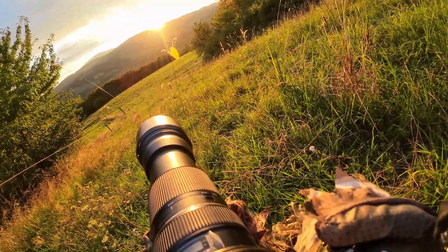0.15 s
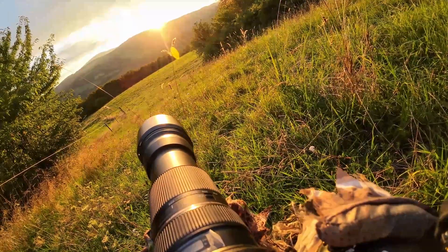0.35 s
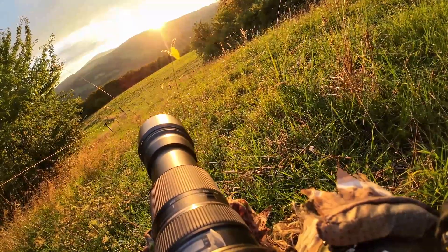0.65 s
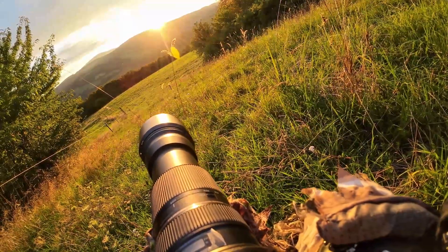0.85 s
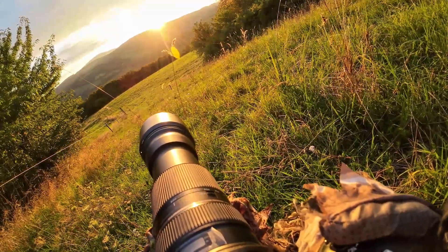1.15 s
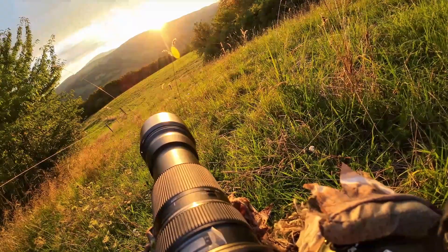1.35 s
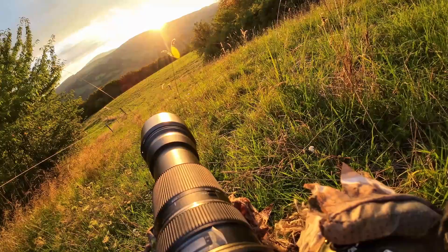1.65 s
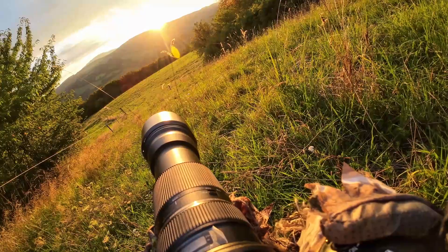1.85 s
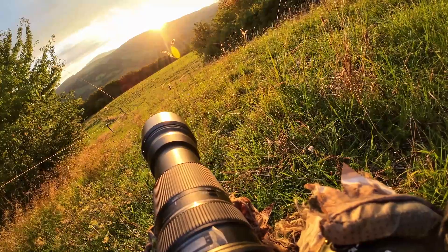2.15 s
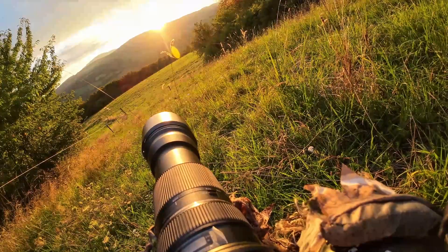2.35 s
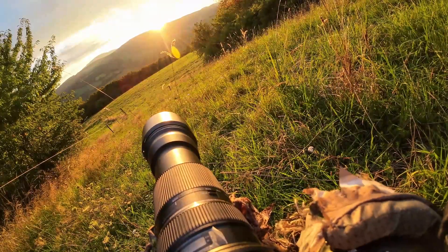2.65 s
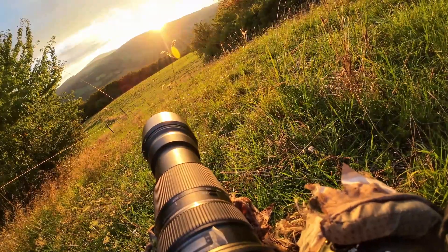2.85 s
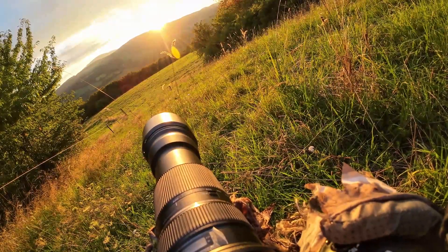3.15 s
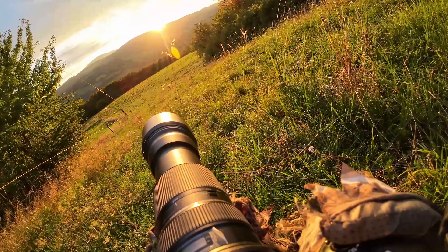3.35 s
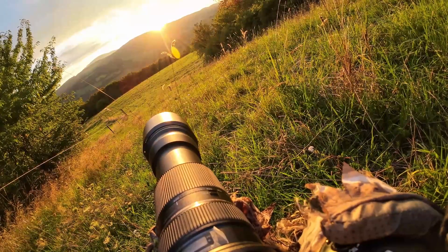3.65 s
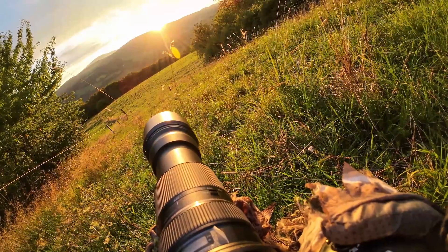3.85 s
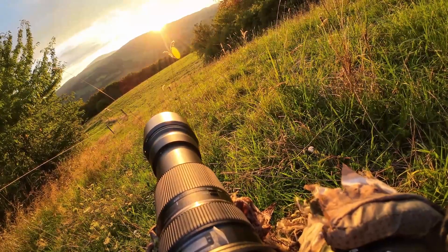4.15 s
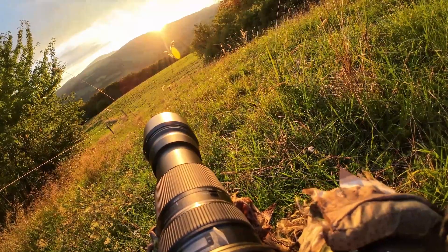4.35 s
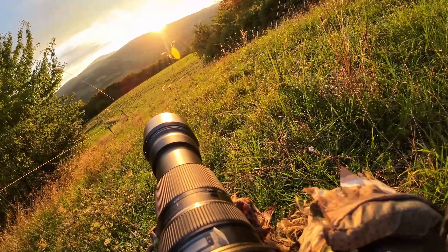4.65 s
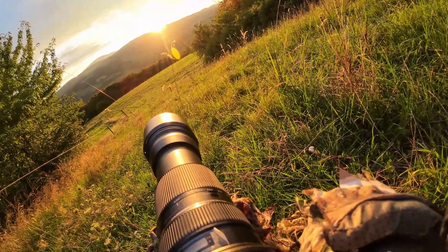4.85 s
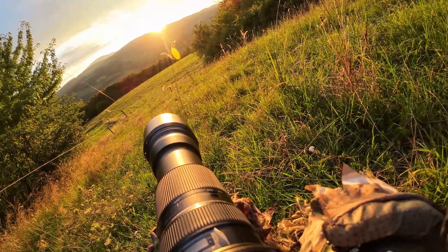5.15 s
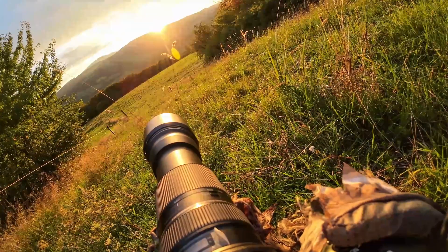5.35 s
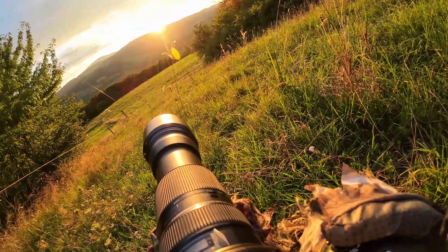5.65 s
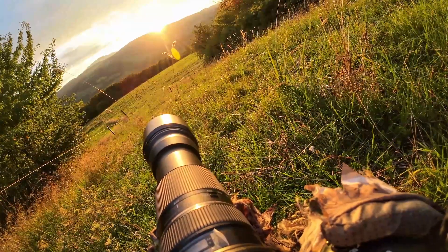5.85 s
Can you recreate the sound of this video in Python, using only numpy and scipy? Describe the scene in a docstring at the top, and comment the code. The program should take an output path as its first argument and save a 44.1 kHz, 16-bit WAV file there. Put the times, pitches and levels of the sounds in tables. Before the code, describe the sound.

A close camera shutter fires once, then twice more, among small dial clicks and soft microphone bumps, ending in a light wind gust.

```python
"""A reflex camera takes three pictures right beside a stereo microphone in a quiet meadow. Each time the mirror
flips up, the shutter curtains run, and a small motor drops the mirror and cocks the springs again. Around the
pictures, just as close, come small dry ticks and a dial clicking from notch to notch; soft bumps reach the
microphone through its mount. A light breeze buffets the microphone and swells to a gust at the end that thumps
it twice, and the grass returns a very faint echo of the clicks."""
import sys
import numpy as np
from scipy import signal
from scipy.fft import rfft, irfft, next_fast_len
from scipy.io import wavfile
from scipy.ndimage import uniform_filter1d, map_coordinates

SR = 44100
rng = np.random.default_rng(int(sys.argv[2]) if len(sys.argv) > 2 else 0)


def unload_wav(signal):
    """Save mono or channel-first audio to the path in sys.argv[1] as 16-bit WAV at rate SR, clipped to [-1, 1]."""
    wavfile.write(
        sys.argv[1],
        SR,
        np.round(np.clip(np.atleast_2d(signal).T, -1, 1) * 32767).astype(np.int16),
    )


N = 265041
HIT = 4096  # samples in one contact sound
T = (np.arange(HIT) - HIT // 16) / SR  # seconds around a contact

# the meadow's hush, with the microphone's faint high hiss near 15.5 kHz: freq_hz, density_db
HUSH_SPECTRUM = [(53, -32.5), (90, 2.5), (200, -4), (410, -7.5), (520, -11.5), (870, -13), (1440, -18.5),
                 (2300, -22), (4000, -27), (5600, -26.5), (8300, -35.5), (11000, -35), (13300, -44),
                 (15500, -39.5)]
# stereo width of the hush: freq_hz, side_minus_mid_db
HUSH_WIDTH = [(130, -8), (600, -5), (1400, -4.5), (3100, -0.5), (7000, 0)]
# breeze on the microphone's ports: freq_hz, density_db
BREEZE_SPECTRUM = [(8.8, -39), (15, 9), (38, -8.5), (67, -10), (119, -21.5), (162, -21.5), (189, -42.5),
                   (300, -40.5), (390, -63), (660, -120)]
# the gust's rumble on the ports: freq_hz, density_db
GUST_SPECTRUM = [(12, -12), (25, -0.5), (42, 0), (75, -8), (130, -18.5), (200, -33.5), (400, -65.5),
                 (700, -120)]
# stereo width of sounds beside the microphone: freq_hz, side_minus_mid_db
CLOSE_WIDTH = [(100, -4.5), (300, -8.5), (700, -21.5), (1300, -18.5), (2400, -13.5), (4400, -9),
               (8100, -1.5), (15000, 2)]
# small dry ticks: start_s, level_db, pitch_hz
TICKS = [(0.0498, -40, 3600), (0.7543, -38, 4300), (1.1098, -36, 5920), (2.2871, -40.5, 2500),
         (2.7292, -44, 2400), (3.3144, -39, 2450), (4.1904, -50.5, 7010), (5.455, -38, 6420),
         (5.9782, -40.5, 3600)]
# colour of a tick: freq_hz, density_db
TICK_SPECTRUM = [(880, -45), (1500, -15), (1810, -27.5), (2440, -5.5), (2970, -14), (6000, -3),
                 (8570, -11.5), (9470, -20), (14200, -25), (16000, -29.5)]
# resonances common to all ticks: freq_hz, width_hz, gain_db
TICK_MODES = [(2434, 130, 4), (3460, 180, 8), (6020, 400, -7)]
# the dial's steps from notch to notch: snap_s, level_db, climb_s
DIAL_STEPS = [(.094, -39.5, .028), (0.145, -38, 0.012), (.206, -39.5, 0.023), (0.3601, -33.5, 0.014),
              (0.587, -37.5, .008), (1.143, -35, .014), (1.171, -39.5, 0.019), (1.23, -36, 0.014),
              (1.268, -32.5, .016), (2.321, -33, 0.014), (2.52, -34, 0.019), (2.594, -35, 0.018),
              (3.344, -35, 0.015), (3.375, -34, 0.016), (3.998, -37.5, 0.0051), (4.162, -38, .02),
              (4.332, -36, 0.018), (4.825, -32.5, 0.0094), (5.997, -38, 0.011)]
# the dial's ball striking a notch: freq_hz, density_db
DETENT_SPECTRUM = [(240, -33), (400, -12), (712, 3), (1250, -25.5), (1940, -22), (2250, -22), (2960, -30),
                   (5860, -25.5), (6820, -40.5), (7350, -31.5), (9230, -39.5), (11800, -39), (15000, -54)]
# the ball scraping up a tooth: freq_hz, density_db
SCRAPE_SPECTRUM = [(290, -27.5), (500, 7), (896, 3), (2050, -6.5), (3320, -22), (6030, -17), (9120, -46.5),
                   (11100, -20), (15000, -44)]
# bumps on the microphone's mount, the last two being thumps of the gust: start_s, level_db, pitch_hz,
# right_port_db
BUMPS = [(1.2044, -19, 86.5, -13), (1.8262, -20.5, 75.3, -11.5), (4.1517, -22.5, 83.5, -13),
         (5.817, -32, 56, -1), (5.961, -38.5, 49.6, -8)]
# the mount shaking: freq_hz, density_db
SHAKE_SPECTRUM = [(20, -6), (60, -1), (110, -2), (200, -8.5), (350, -12.5), (600, -44), (1500, -100)]
# the pictures: release_s, rewind_start_s, rewind_stretch_ratio
PICTURES = [(2.6195, 2.7406, 0.98), (4.4567, 4.578, 0.98), (4.899, 5.0294, 1)]
# blows of an exposure, timed from the release: delay_s, level_db, part
EXPOSURE_BLOWS = [(-.001, -34, "lever"), (.0016, -5.5, "mirror"), (.0049, -6.5, "mirror"),
                  (.0135, -14.5, "catch"), (.015, -10.5, "catch"), (.0192, -15.5, "bounce"),
                  (.0417, -14.5, "curtain"), (.0455, -12.5, "curtain"), (.047, -20, "spring")]
# blows of a rewind, timed from the motor's start: delay_s, level_db, part
REWIND_BLOWS = [(.0365, -27.5, "cam"), (.042, -32.5, "cam"), (.066, -16, "pawl"), (.1015, -31.5, "lever"),
                (.1093, -19, "spring"), (.1153, -11.5, "spring"), (.1228, -23, "lever"),
                (.1258, -24.5, "lever"), (.1387, -21, "lever"), (.169, -24, "spring"), (.171, -28, "latch"),
                (.1928, -19.5, "latch"), (.198, -32, "latch"), (.235, -37.5, "cam"), (.240, -37, "cam")]
# colour of each camera part, by name: freq_hz, density_db
PART_SPECTRA = { "mirror": [(71, -61.5), (120, -28.5), (789, -20.5), (1290, -8), (2070, -10.5),
                (2340, -2.5), (2870, -7.5), (3740, -7), (4140, -25.5), (4780, -13), (8840, -22),
                (9400, -23), (10200, -18.5), (14400, -33.5), (16000, -40.5)], "catch": [(180, -43.5),
                (300, -8), (1390, -13), (2400, 1), (3080, -5.5), (3580, -6), (4370, 3.5), (6850, -20),
                (9390, -16), (12500, -22.5), (13800, -37), (16000, -34)], "bounce": [(71, -51),
                (120, -16.5), (727, -13.5), (1070, -1.5), (1580, -15.5), (2110, -12), (2430, -9.5),
                (2990, -12.5), (4590, -19.5), (5750, -20), (7050, -26), (10600, -26), (16000, -42)],
                "curtain": [(140, -48), (230, -4.5), (667, -12.5), (1040, -2), (2040, -9.5), (2390, -5),
                (2660, -12), (3020, -7.5), (3870, -12), (5920, -9), (7330, -27.5), (8010, -12),
                (9070, -24.5), (10300, -16.5), (16000, -37)], "cam": [(180, -43), (300, -17), (1060, -3),
                (1530, -19), (2440, -7.5), (3830, -16), (5160, -14.5), (9090, -28.5), (10400, -24),
                (13500, -51), (14700, -38.5), (16000, -47)], "pawl": [(350, -56.5), (600, -20.5),
                (1610, -11), (2240, -13.5), (3390, 2.5), (4050, -15.5), (6030, -17), (7210, -13.5),
                (8390, -10), (9360, -24), (10300, -9), (16000, -44)], "spring": [(240, -44), (400, -7.5),
                (655, -13), (1030, -3.5), (1600, -18), (2670, -1), (3810, -12.5), (5270, 1.5),
                (7280, -13.5), (11400, -14.5), (13900, -28.5), (16000, -29.5)], "lever": [(180, -40.5),
                (300, -11.5), (842, -3.5), (1840, -6.5), (2000, -7.5), (2400, -1), (3130, -11.5),
                (3580, -3.5), (4230, -10), (5160, -4), (6100, -19), (8090, -14.5), (16000, -42)],
                "latch": [(180, -46.5), (300, -15.5), (1030, -4.5), (1390, -14), (1640, -6), (1970, -13),
                (3030, -9), (3400, -6), (4160, -9.5), (4910, -9), (7950, -23), (9710, -17), (16000, -39)]}
# how long each part rings, by name: t60_s
PART_T60 = {"mirror": 0.0096, "catch": .011, "bounce": .021, "curtain": .018, "cam": .025, "pawl": 0.0055,
            "spring": 0.0092, "lever": .015, "latch": .014}
# resonances of the camera body, plus the microphone's high sheen near 15.6 kHz:
# freq_hz, width_hz, gain_db
BODY_AND_MIC_MODES = [(538.5, 24, -2), (650, 64, -3.5), (963, 160, -1), (1108, 94, -2), (1346, 190, -1),
                      (1838, 57, -1), (2325, 53, -2.5), (2470, 90, -0.5), (3500, 110, -5),
                      (5140, 110, -7.5), (15600, 830, -2.5)]
# whirr of the motor's gear train: freq_hz, density_db
GEAR_SPECTRUM = [(240, -30), (400, -8.5), (607, -9), (1070, -1.5), (1870, -12.5), (2290, -5.5),
                 (4050, -19.5), (4440, -12), (6950, -26.5), (10500, -31.5), (12700, -38.5), (13300, -51),
                 (16000, -37)]


def amp(db):
    """Decibels to amplitude."""
    return 10 ** (np.asarray(db) / 20)


def unit(x):
    """Scale to rms 1."""
    return x / np.sqrt(np.mean(x ** 2) + 1e-20)


def decay(t, t60):
    """A fade that loses 60 dB in t60 seconds."""
    return np.exp(-np.log(1000) * t / t60)


def gain_curve(points, size):
    """Gain in each bin of a size-sample FFT, from (freq_hz, db) points joined on a log axis."""
    hz, db = np.transpose(points)
    return amp(np.interp(np.log(np.fft.rfftfreq(size, 1 / SR) + 1), np.log(hz + 1), db))


def add(track, start_s, sound):
    """Mix a stereo sound into the track."""
    part = track[:, max(round(start_s * SR), 0):][:, :sound.shape[1]]
    part += sound[:, :part.shape[1]]


def stereo(pair, width=CLOSE_WIDTH):
    """Two unrelated sounds become mid and side of the two microphone ports."""
    mid, size = pair[0], pair.shape[1]
    side = irfft(rfft(pair[1]) * gain_curve(width, size), size)
    return np.array([mid + side, mid - side])


def noise(spectrum, size):
    """Two unrelated coloured noises of rms 1."""
    padded = next_fast_len(size)
    white = rfft(rng.standard_normal((2, padded)))
    return unit(irfft(white * gain_curve(spectrum, padded), padded)[:, :size])


def causal(gain):
    """The response with this gain that answers only after it is struck (minimum phase)."""
    cepstrum = irfft(np.log(gain + 1e-6))
    cepstrum[..., 1:HIT // 2] *= 2
    cepstrum[..., HIT // 2 + 1:] = 0
    return np.exp(rfft(cepstrum))


def ringing(spectrum, modes=()):
    """A part's response at unit power: a broad colour with resonances standing out of it."""
    hz = np.fft.rfftfreq(HIT, 1 / SR)
    peaks = 1 + sum(amp(db) / (1 + (2 * (hz - centre) / width) ** 2) for centre, width, db in modes)
    return causal(unit(gain_curve(spectrum, HIT) * peaks))


def grit():
    """Two white noises standing for the tiny contacts within a blow."""
    return rng.standard_normal((2, HIT))


def blow(contacts, t60, response, attack_s=0.00056, smooth_bins=32):
    """A dying chatter of tiny contacts, evened out over all bands, rings a part near the microphone."""
    age = np.maximum(T, 0)
    fade = decay(age, t60) * (1 - np.exp(-age / attack_s))
    chatter = rfft(contacts * fade)
    band_power = np.abs(uniform_filter1d(np.abs(chatter) ** 2, smooth_bins, axis=1))
    even_chatter = chatter / causal(np.sqrt(band_power)) * np.linalg.norm(fade)
    return signal.windows.tukey(HIT, 0.1) * stereo(irfft(even_chatter * response))


def hush(level_db=-66):
    """The even hush of the meadow, with the microphone's faint high hiss on top."""
    return amp(level_db) * stereo(noise(HUSH_SPECTRUM, N), HUSH_WIDTH)


def wind(breeze_db=-51, gust_db=-36, peak_s=5.857, rise_db_per_s=61, fall_db_per_s=20, lean_db=1):
    """A steady breeze and one gust buffet each port on its own, the left a little harder."""
    from_peak_s = np.arange(N) / SR - peak_s
    swell_db = np.minimum(rise_db_per_s * from_peak_s, -fall_db_per_s * from_peak_s)
    gust = amp(gust_db + swell_db) * noise(GUST_SPECTRUM, N)
    breeze = amp(breeze_db) * noise(BREEZE_SPECTRUM, N)
    return (breeze + gust) * amp([[lean_db], [-lean_db]])


def ticks(gain_db=-4, t60=0.0067, ping_width_hz=500, ping_db=4):
    """Tiny bright contacts close by, each with a brief ping of its own pitch."""
    out = np.zeros((2, N))
    for start_s, level_db, pitch_hz in TICKS:
        response = ringing(TICK_SPECTRUM, [*TICK_MODES, (pitch_hz, ping_width_hz, ping_db)])
        add(out, start_s + T[0], amp(level_db + gain_db) * blow(grit(), t60, response))
    return out


def dial(unseat_db=-46, scrape_db=-21.5, scrape_db_per_s=200.5, rough_db=4, snap_db=-2, t60=0.011):
    """The sprung ball leaves its notch, scrapes unevenly up a tooth and snaps into the next notch."""
    out, response = np.zeros((2, N)), ringing(DETENT_SPECTRUM)
    for snap_s, level_db, climb_s in DIAL_STEPS:
        add(out, snap_s - climb_s + T[0], amp(unseat_db) * blow(grit(), t60, response))
        loudness = amp(level_db + scrape_db + scrape_db_per_s * climb_s)  # a slower climb is louder
        swell = np.exp(-.5 * ((T - T.mean()) / (0.44 * climb_s)) ** 2)
        roughness = unit(amp(rough_db * unit(uniform_filter1d(rng.standard_normal(HIT), size=96))))
        scrape = loudness * swell * roughness * stereo(noise(SCRAPE_SPECTRUM, HIT))
        loudest_s = snap_s - 0.25 * climb_s
        add(out, loudest_s - HIT / 2 / SR, scrape)
        add(out, snap_s + T[0], amp(level_db + snap_db) * blow(grit(), t60, response))
    return out


def grass_echo(clicks, level_db=-40, t60=0.69):
    """Grass and bushes scatter a very faint, dull tail back to the microphone."""
    t = np.arange(SR // 2) / SR
    tail = noise([(200, -4.0), (1500, -0.5), (5000, -2.5), (15000, -20.5)], len(t)) * decay(t, t60)
    return amp(level_db) * signal.fftconvolve(clicks, tail / np.linalg.norm(tail[0]), axes=1)[:, :N]


def knock(pitch_hz, sag, right_db, sag_s=0.0031, attack_s=0.003, t60=0.069, shake_db=-19, shake_t60=0.22):
    """A soft knock rocks the mount, its pitch sagging, and leaves it shaking; the left port feels it most."""
    t = np.arange(2 * HIT) / SR
    phase = 2 * np.pi * np.cumsum(pitch_hz * (1 + sag * np.exp(-t / sag_s))) / SR
    rock = np.sin(phase) * decay(t, t60)
    shake = amp(shake_db) * noise(SHAKE_SPECTRUM, len(t))[0] * decay(t, shake_t60)
    left = (shake - rock) * (1 - np.exp(-t / attack_s))
    right = amp(right_db) * np.interp(t - 0.00027, t, left)  # reaches this port 0.27 ms later
    return np.array([left, right])


def bumps():
    """Now and then something nudges the microphone's mount, and near its peak the gust thumps it twice."""
    out = np.zeros((2, N))
    for start_s, level_db, pitch_hz, right_db in BUMPS:
        add(out, start_s, amp(level_db) * knock(pitch_hz, sag=1.4, right_db=right_db))
    return out


def mechanism(blows, runs, variation, scatter_db, body_db=-27, body_t60=0.08):
    """The same parts collide in order, nearly alike on every run; each blow leaves the body ringing."""
    out = np.zeros((2, N))
    for delay_s, level_db, part in blows:
        response, contacts = ringing(PART_SPECTRA[part], BODY_AND_MIC_MODES), grit()
        for start_s, stretch in runs:
            hit = blow(contacts + variation * grit(), PART_T60[part], response)
            body_ring = amp(body_db) * blow(grit(), body_t60, response)
            strength = amp(level_db + scatter_db * rng.normal())
            add(out, start_s + stretch * delay_s + T[0], strength * (hit + body_ring))
    return out


def shutter(thud_delay_s=0.0428, thud_db=-24.5):
    """The mirror flips up and the curtains run; the closing curtain jolts the mount."""
    runs = [(release_s, 1) for release_s, _, _ in PICTURES]
    out = mechanism(EXPOSURE_BLOWS, runs, variation=0.3, scatter_db=0.27)
    for release_s, _ in runs:
        add(out, release_s + thud_delay_s, amp(thud_db) * knock(pitch_hz=143, sag=0.52, right_db=-7.5))
    return out


def rewind():
    """Cam, pawl, levers and latch clatter as the mirror drops and the springs are cocked."""
    runs = [(start_s, stretch) for _, start_s, stretch in PICTURES]
    return mechanism(REWIND_BLOWS, runs, variation=0.45, scatter_db=1.1)


def motor_effort(t, idle_db=-59.5, load_db=14.5, peak_s=0.13, spread_s=0.066, run_s=0.25):
    """The motor's amplitude over a run: it turns freely, labours against the springs, then brakes."""
    springs = np.exp(-.5 * ((t - peak_s) / spread_s) ** 2)
    braking_db = 1300 * np.maximum(t - run_s, 0)
    return amp(idle_db + load_db * springs - braking_db)


def motor(tooth_hz=430, pulse_depth=0.5, shake_db=-53):
    """The gear train whirrs, its noise pulsing as the teeth mesh, and makes the body tremble."""
    out, t = np.zeros((2, N)), np.arange(SR // 3) / SR
    for _, start_s, stretch in PICTURES:
        effort = motor_effort(t / stretch)
        teeth = unit(1 + pulse_depth * np.sin(2 * np.pi * (tooth_hz * t + rng.random())))
        whirr = effort * teeth * stereo(noise(GEAR_SPECTRUM, len(t)))
        tremble = amp(shake_db) * effort / effort.max() * stereo(noise(SHAKE_SPECTRUM, len(t)))
        add(out, start_s, whirr + tremble)
    return out


def scene():
    """The camera up close, its echo off the grass, bumps and wind on the microphone, a hush behind."""
    close = shutter() + rewind() + motor() + dial() + ticks()
    return close + grass_echo(close) + bumps() + wind() + hush()


def record(dry, top_hz=16400):
    """The recorder keeps nothing above its band limit."""
    padded = next_fast_len(N + HIT)
    lowpass = 1 / np.sqrt(1 + (np.fft.rfftfreq(padded, 1 / SR) / top_hz) ** 200)
    return irfft(rfft(dry, padded) * lowpass, padded)[:, :N]


dry = scene()
out = record(dry)
unload_wav(out)
```